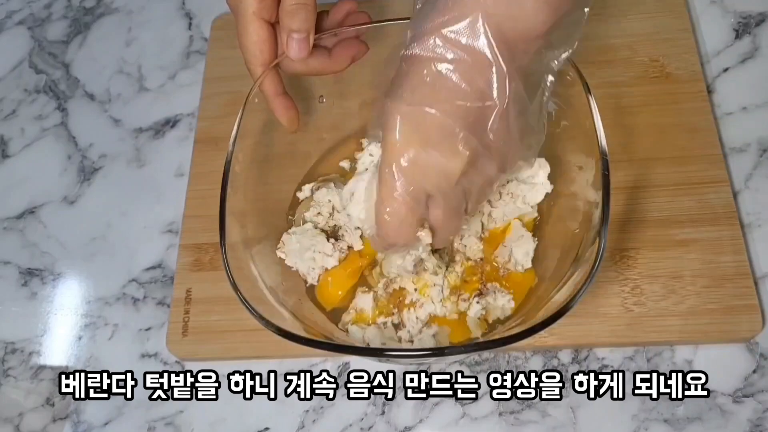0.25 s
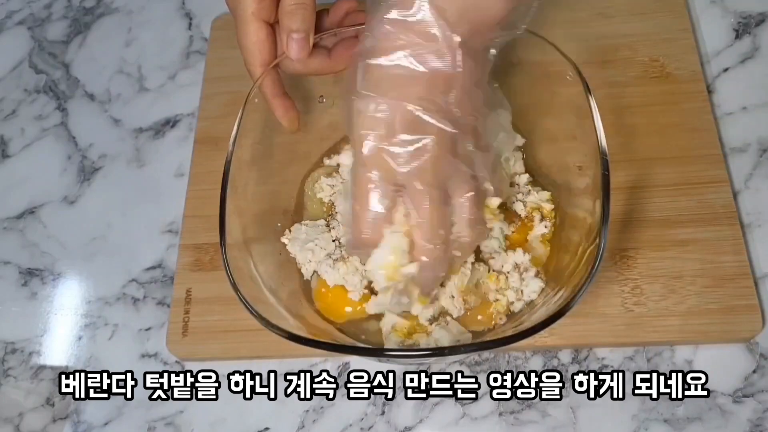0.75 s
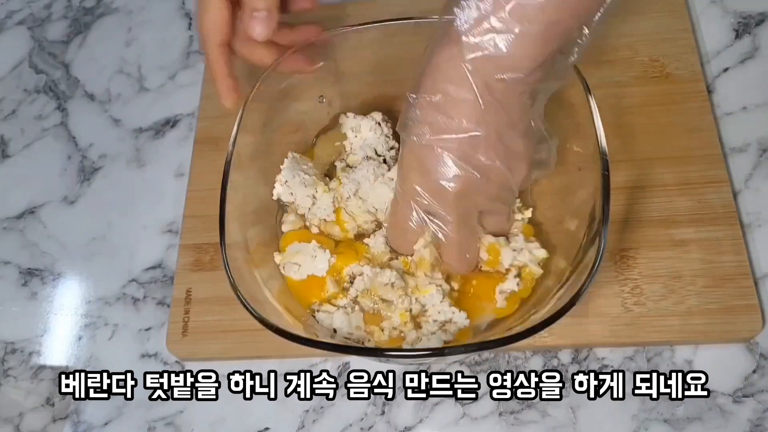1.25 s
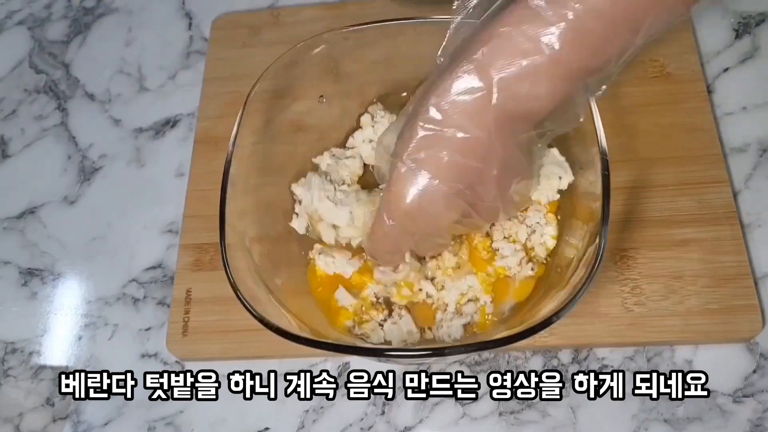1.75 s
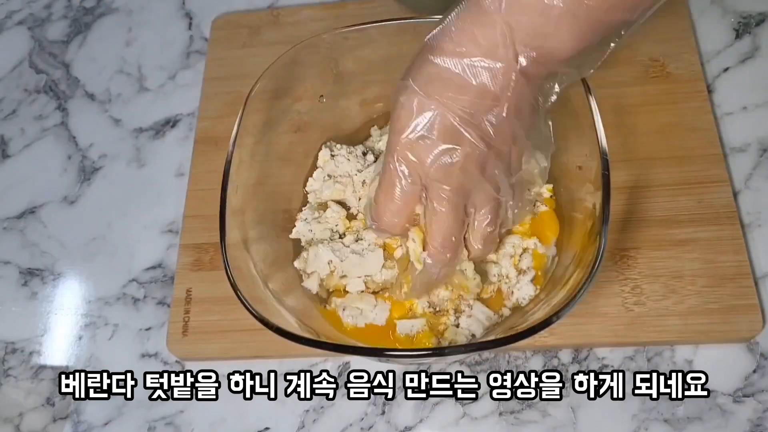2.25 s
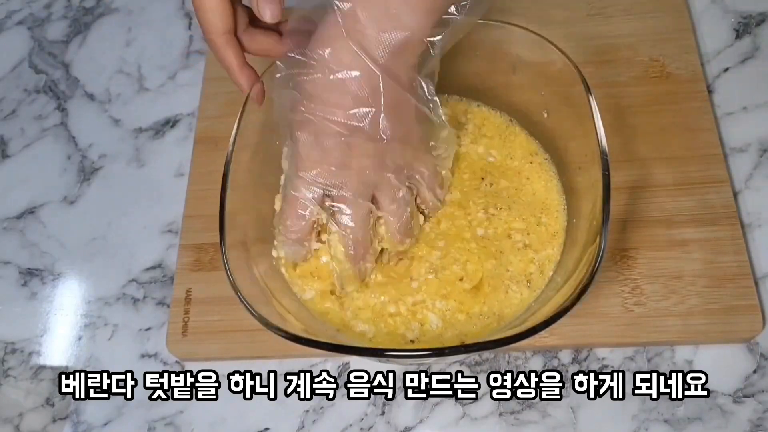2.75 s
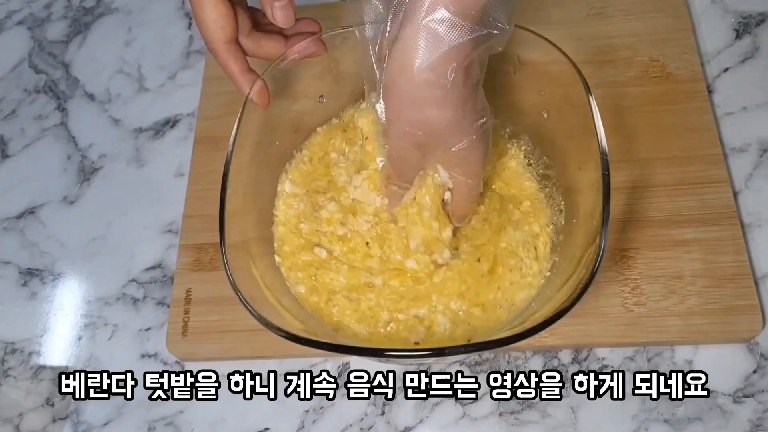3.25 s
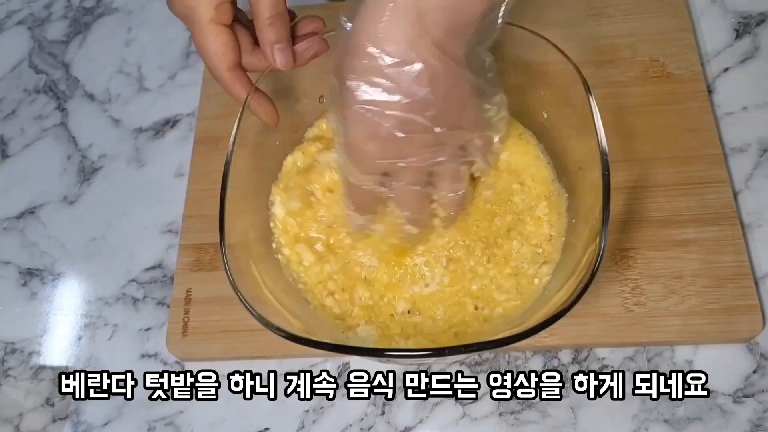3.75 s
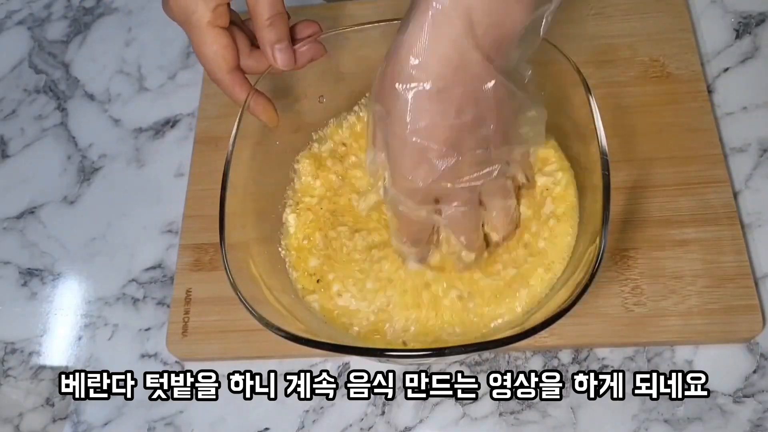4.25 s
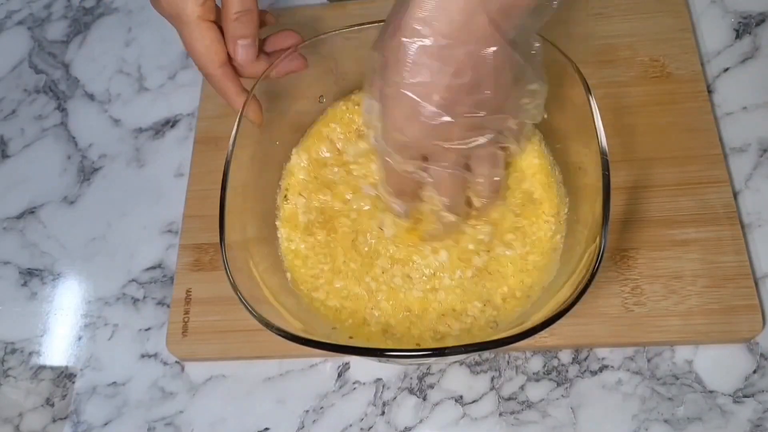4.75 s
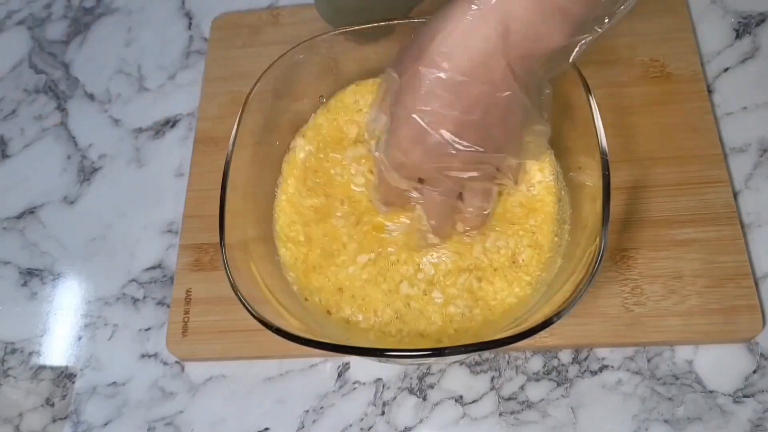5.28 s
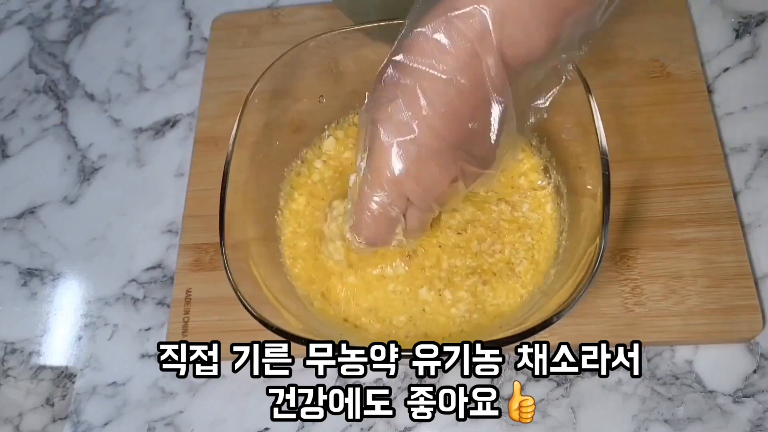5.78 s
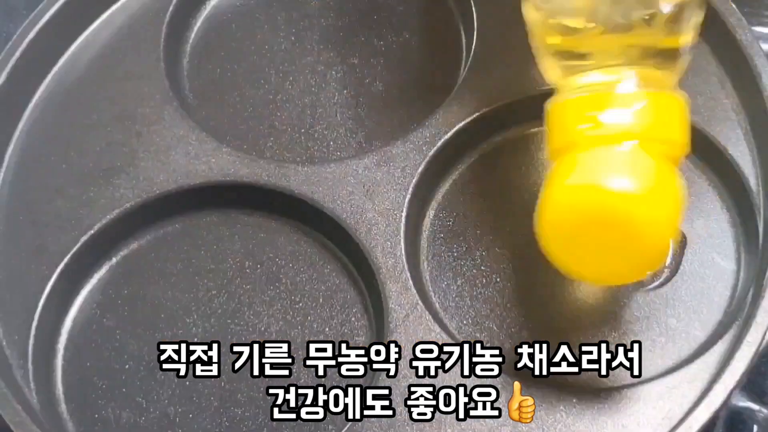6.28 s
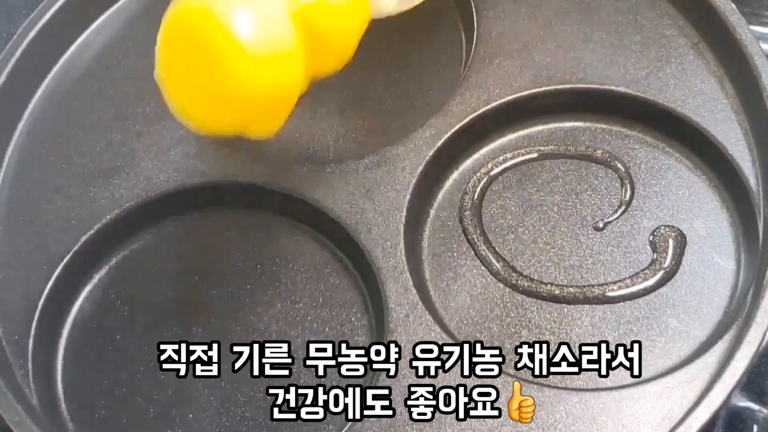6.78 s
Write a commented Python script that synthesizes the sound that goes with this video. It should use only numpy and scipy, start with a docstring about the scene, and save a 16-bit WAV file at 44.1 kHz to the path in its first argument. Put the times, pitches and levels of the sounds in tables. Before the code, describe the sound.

From the start, a hand in a thin plastic glove kneads wet food in a glass bowl, close by in a quiet kitchen. Several squeezes a second bring bright crinkles, sharp little snaps, wet squelches and small air pops. Now and then the bowl knocks softly on a board. At about 2.7 seconds a faint low rumble and hum come in underneath. The kneading continues, grows gentler from around 4 seconds, and is very faint between 5 and 5.8 seconds before picking up again. At about 6.4 seconds it stops, replaced by a stove fan's gusty hiss with faint, thin whistles and a low, wavering drone. Oil spits briefly from a bottle twice, faintly at 6.7 seconds and more clearly near 6.9, while the fan carries on to the end just after 7 seconds.

```python
"""In a kitchen, a hand in a thin plastic glove kneads soft food in a glass bowl. The glove rustles and snaps
as it folds, the mash squelches, air pockets pop, and the bowl thumps on the board.
Three scenes play with short gaps between them: kneading in a still room, kneading over a low rumble,
then a stove, where oil spurts twice from a bottle under a hissing fan and a low, wandering drone."""
import sys
import numpy as np
from scipy import signal
from scipy.io import wavfile

SR = 44100
rng = np.random.default_rng(int(sys.argv[2]) if len(sys.argv) > 2 else 0)


def to_wav(sig):
    """Store sig (one row per channel, or 1-D mono) as 16-bit WAV at the path in sys.argv[1].

    Samples outside -1..1 are clipped; the rate is SR.
    """
    pcm = np.clip(np.atleast_2d(sig), -1, 1) * 32767
    pcm = np.round(pcm).astype(np.int16)
    wavfile.write(sys.argv[1], SR, pcm.T)  # frames by channels


N = 309582

# when each scene plays: start_s, end_s
STILL_ROOM, RUMBLING_ROOM, STOVE = (-1, 2.623), (2.655, 6.351), (6.395, 8)
# the tone colour of each noise: pitch_hz, relative_db
STILL_COLOUR = [(12, -45), (20, -2), (43, -11), (114, -4.5), (277, -21), (558, -43), (709, -16), (900, -24),
                (1170, -11), (1980, -120)]
GLOVE_COLOUR = [(880, -49), (1500, -4.5), (1810, -3.5), (3960, 2.5), (5540, -2.5), (6180, 2), (12900, -3.5),
                (14900, -5), (16000, -8.5)]
MASH_COLOUR = [(120, -62), (200, -12.5), (318, -24), (354, -11.5), (471, -14.5), (660, -3.5), (782, -3),
               (1240, 2), (1520, -6.5), (2500, -5.5), (3250, -11), (5500, -120)]
RUMBLE_COLOUR = [(12, -20), (20, -11.5), (65, -7.5), (96, -12), (248, -26.5), (337, -24), (499, -27),
                 (698, -35), (1030, -32), (1660, -100), (11100, -49), (16000, -50)]
FAN_COLOUR = [(12, -48), (20, -24), (60, -12.5), (134, -6), (277, -17.5), (319, -13.5), (607, -25),
              (873, -13), (1290, -42), (3340, -38), (4060, -45), (4810, -31), (6360, -42), (12800, -41.5),
              (16000, -46)]
# how alike left and right are, for near and far sounds: pitch_hz, likeness (0 to 1)
NEAR_LIKENESS = [(130, 0.56), (640, 0.76), (1400, 0.57), (3000, 0.28), (15000, 0)]
FAR_LIKENESS = [(60, 0.83), (130, 0.9), (290, 0.76), (640, 0.38), (1400, 0.077), (3000, 0.03)]
# which side the hand is heard on: pitch_hz, left_minus_right_db
HAND_SIDE = [(300, -1.5), (600, 2.5), (1200, 5.5), (2500, 0.5), (9000, 2.5)]
# the hand resting in the mash: time_s, rustle_db, squelch_db
RESTING_HAND = [(0, -56, -72.5), (1.88, -57.5, -64), (2.3, -51, -55), (2.47, -65, -91), (2.698, -56.5, -71),
                (3.5, -91, -67), (3.9, -74, -78.5), (4.5, -74, -73.5), (4.95, -75.5, -80),
                (5.76, -81.5, -86.5), (5.82, -73, -65.5), (6.35, -57.5, -62)]
# fingers squeezing the mash: full_strength_s, hold_s, rustle_db, squelch_db
FINGER_SQUEEZES = [(0, 0.0022, -43.5, -45.5), (0.082, 0.079, -47.5, -57.5), (0.174, 0.039, -51.5, -59.5),
                   (0.276, 0.019, -50.5, -54), (0.328, 0.033, -45, -52), (0.402, 0.042, -48, -55.5),
                   (0.49, 0.039, -48.5, -60.5), (0.562, 0.035, -46.5, -56), (0.61, 0.04, -48.5, -57),
                   (0.726, 0.037, -46, -53.5), (0.798, 0.064, -46, -53.5), (0.888, 0.043, -49, -55),
                   (0.983, 0.069, -46, -55.5), (1.11, 0.089, -53.5, -55.5), (1.194, 0.052, -45.5, -58),
                   (1.272, 0.014, -50, -57), (1.341, 0.039, -43.5, -53), (1.404, 0.03, -48.8, -57.5),
                   (1.488, 0.061, -46.5, -50), (1.576, 0.023, -50, -56.5), (1.647, 0.0064, -43.5, -49.5),
                   (1.735, 0.032, -46, -55), (1.803, 0.024, -46.5, -54.5), (1.923, 0.056, -49, -56),
                   (1.983, 0.039, -49, -59.5), (2.052, 0.048, -53, -59.5), (2.146, 0.027, -43.5, -57.0),
                   (2.284, 0.015, -42.5, -52), (2.339, 0.0022, -43, -51.5), (2.396, 0.027, -51.5, -58.5),
                   (2.512, 0.02, -50.5, -56.5), (2.55, 0.1, -48, -55), (2.661, 0.058, -52, -56),
                   (2.788, 0, -51, -55.5), (2.833, 0.0025, -58, -65), (2.901, 0.051, -48, -59.5),
                   (3.028, 0.017, -50.5, -48), (3.098, 0.056, -56.5, -61.5), (3.15, 0.058, -59, -65.5),
                   (3.286, 0.054, -48, -57.5), (3.337, 0.046, -51, -57.5), (3.458, 0.0042, -52, -60.5),
                   (3.53, 0.039, -54.5, -62), (3.578, 0.032, -56, -74), (3.655, 0.057, -55.5, -61.5),
                   (3.751, 0.033, -54, -65), (3.838, 0.0035, -57, -61), (3.956, 0, -63, -68),
                   (4.131, 0, -59, -62.5), (4.181, 0.0, -52.5, -62), (4.247, 0, -61.5, -65.5),
                   (4.509, 0, -60, -59), (4.636, 0.066, -64.5, -77), (4.775, 0.084, -66, -70),
                   (5.02, 0, -71, -87), (5.073, 0.0076, -71, -89), (5.22, 0.0022, -70, -71),
                   (5.398, 0.05, -77, -77.5), (5.586, 0.067, -79, -89), (5.86, 0.044, -60.5, -70),
                   (5.953, 0.026, -53.5, -66), (6.015, 0.03, -58, -68), (6.114, 0.032, -48.5, -57),
                   (6.219, 0, -68, -57), (6.34, 0.086, -56.5, -80)]
# air pockets bursting in the mash: start_s, peak_db, pitch_hz
MASH_POPS = [(.006, -31.5, 1160), (.175, -43, 1170), (.289, -38, 1200), (.323, -37, 1150),
             (.481, -39, 1230), (.739, -33.5, 1370), (0.786, -40, 1370), (.84, -37, 1420),
             (.979, -35, 1230), (1.002, -35, 960), (1.147, -40, 1100), (1.185, -35, 1240),
             (1.278, -33, 1090), (1.537, -33, 820), (1.624, -37, 1290), (1.641, -27.5, 1220),
             (1.668, -39, 1240), (1.737, -38, 1350), (1.812, -37, 885), (2.084, -39, 1097),
             (2.283, -41, 1800), (2.346, -32, 1480), (2.399, -33, 1110), (2.522, -33.5, 1190),
             (2.564, -36, 1280), (2.577, -40, 1210), (2.78, -42.5, 920), (2.79, -46, 1190),
             (2.832, -44.5, 990), (2.93, -52, 1190), (2.95, -41, 1250), (3.014, -44, 1190),
             (3.183, -46, 1200), (3.242, -43, 1230), (3.468, -37, 1580), (3.476, -40, 1370),
             (3.55, -48, 1290), (3.66, -47, 1200), (3.7, -50, 1300), (3.725, -45.5, 1370),
             (3.759, -48, 1200), (3.826, -45, 1980), (3.855, -47.5, 1240), (3.995, -56.5, 1280),
             (4.043, -56, 1240), (4.134, -48.5, 1170), (4.18, -38.5, 1820), (4.291, -53.5, 1060),
             (4.35, -53, 1800), (4.492, -47.5, 760), (4.635, -47, 2190), (4.681, -43, 1350),
             (4.802, -48, 737), (4.902, -58, 910), (4.979, -60, 1090), (5.02, -55.5, 920),
             (5.144, -60, 1400), (5.221, -54, 1205), (6.035, -47, 1300), (6.083, -40.5, 1170),
             (6.142, -32.5, 1020)]
# loud snaps of the glove: time_s, peak_db, pitch_hz, left_minus_right_db
GLOVE_SNAPS = [(0.0217, -27, 9000, 5), (0.0944, -30.0, 9800, 12), (0.1409, -28.5, 12700, 5),
               (0.2082, -33.5, 9550, 3), (0.2236, -34, 10300, 2.0), (0.3242, -31, 13500, 8),
               (0.3963, -31, 10000, 3.0), (0.4134, -33, 5000, 9), (0.4816, -28, 2820, 7),
               (0.5211, -27, 10000, 2), (0.5822, -23, 9500, 6), (0.5914, -33, 12700, 3.0),
               (0.5982, -26.5, 13500, 3), (0.6801, -30.5, 8600, 0.0), (0.8074, -29, 13200, 3.0),
               (0.816, -30.5, 7700, 2), (0.8939, -31, 10100, 5.0), (0.9114, -19.5, 5900, 1),
               (0.9414, -28.5, 12700, 8.0), (0.9813, -31, 7250, 12), (1.0792, -37, 10800, 3),
               (1.1492, -28, 7450, 3), (1.1863, -23.5, 6670, 3.5), (1.2533, -38, 9600, 6.0),
               (1.2781, -31, 9300, 4), (1.3717, -26, 9900, -0.5), (1.445, -26, 8900, -3),
               (1.4939, -26.5, 9200, -1), (1.5392, -29, 12700, 1.0), (1.5538, -28.5, 7800, 5),
               (1.6022, -33, 11400, 3.0), (1.6227, -29, 9800, 3), (1.6685, -32, 12600, 5),
               (1.7377, -30, 10600, 2.0), (1.852, -34.5, 11100, 6.0), (1.8946, -31.5, 7100, 4.0),
               (1.9078, -31.0, 10800, 3), (1.9246, -25.5, 11900, 3.0), (2.0838, -34, 6900, 8.0),
               (2.1063, -30, 8750, 7), (2.1878, -34, 12700, 6.0), (2.21, -25.5, 12900, 7),
               (2.3414, -32, 4930, -7), (2.402, -28.5, 9500, 7.0), (2.4563, -35, 6800, 3.0),
               (2.4902, -40.0, 8900, 3.0), (2.5227, -28.5, 10100, 1), (2.563, -22, 8000, 3.0),
               (2.5914, -24, 13400, 5.5), (2.6671, -35, 6340, 3.0), (2.7172, -33, 11200, 3.0),
               (2.7869, -34, 11200, -5), (2.8855, -33, 6200, 1.0), (2.9026, -33, 11200, 7.0),
               (2.9661, -37, 8700, 4.0), (3.0037, -36, 9200, 5), (3.0958, -30, 10400, 6.0),
               (3.1372, -35.5, 10300, 2), (3.1935, -34, 12800, 6.0), (3.2458, -34.5, 9500, 5),
               (3.3111, -27, 5300, 0), (3.4399, -32.5, 8200, 2), (3.4689, -36.5, 2500, -4),
               (3.4758, -36.0, 11300, -1), (3.5341, -26, 3960, -1), (3.6149, -36.5, 9600, 10),
               (3.6637, -30, 9700, 6), (3.9524, -39.5, 9700, 7), (4.0102, -48, 7700, 3),
               (4.0415, -47, 7100, 2), (4.1017, -47, 9600, 7.0), (4.1349, -30.0, 11300, 8),
               (4.1788, -28, 9700, 7), (4.2553, -45.0, 3800, 0), (4.6361, -28.5, 10300, 7),
               (4.6615, -40, 9400, 3.0), (4.6819, -41, 9000, 10), (4.7379, -41, 7260, 6),
               (4.781, -49.0, 9600, 8.0), (4.8419, -36, 8300, 4), (5.0932, -50, 11100, 3.0),
               (5.2222, -53, 8000, 2), (5.2397, -50.5, 5540, 1), (5.8184, -40.5, 6550, 8.0),
               (5.8699, -38, 5330, 5.0), (5.9061, -34, 6940, 2.0), (5.9589, -33.5, 11700, 9),
               (6.0373, -46, 3130, 3.0), (6.1283, -34, 12700, 2.0), (6.2094, -36, 9900, 7),
               (6.2595, -39.5, 5330, 1.0)]
# the bowl pressed on the board: start_s, level_db, pitch_hz, decay_s
BOWL_THUMPS = [(.22, -62, 102, 0.054), (.73, -65.5, 146, 0.057), (1.15, -52.5, 386, 0.013),
               (1.49, -46, 73.6, 0.017), (1.88, -61, 138, 0.027), (2.27, -55.5, 442, 0.052),
               (3.02, -51.5, 147, 0.021), (3.15, -59.5, 130, 0.027), (3.46, -57, 183, 0.043),
               (4.49, -46.5, 303, 0.019), (4.795, -55.5, 271, 0.029), (6.11, -57, 133, 0.027)]
# the wet glove loses its highest treble for a while: time_s, gain_db
TREBLE_GAIN = [(3.3, 3.5), (3.8, -5.5), (5.1, 3.5), (5.6, 5.5)]
# the rumble's rise and fall: time_s, gain_db
RUMBLE_GAIN = [(2.65, 5.5), (3.5, 1.5), (4.0, 1.5), (4.85, 1), (5.1, -3), (5.5, -1), (5.8, -0.5), (6.35, 2)]
# the fan's rushing air: time_s, level_db
FAN_AIR_LEVEL = [(6.4, -48.5), (6.75, -48), (6.9, -44.5), (7.02, -47.5)]
# a low drone wandering at random between about 100 and 150 Hz: time_s, pitch_hz, level_db
LOW_DRONE = [(6.41, 149.3, -53), (6.47, 138.8, -51), (6.55, 117.3, -47), (6.61, 151.6, -48.5),
             (6.71, 100.2, -53), (6.79, 135.6, -46.5), (6.84, 151.4, -48), (6.9, 118.1, -49.5),
             (7.0, 139.6, -47)]
# the fan's thin whistles: pitch_hz, width_hz, level_db
FAN_WHISTLES = [(4120, 330, -67.5), (6500, 97, -71.5), (11500, 590, -75), (12500, 800, -73)]
# oil spurting from the bottle: start_s, level_db, pitch_hz, decay_s
OIL_SPURTS = [(6.71, -56, 9200, 0.01), (6.868, -42.5, 1480, 0.015)]

BOWL_HZ, BOWL_WIDTH_HZ = 1332, 69   # the ring of the air in the bowl's hollow
KNEADING_END_S = RUMBLING_ROOM[1]


def from_db(db):
    """Turns decibels into a gain."""
    return 10 ** (np.asarray(db) / 20)


def unit_level(x):
    """Scales a sound to an average (rms) level of 1."""
    return x / np.sqrt(np.mean(x ** 2) + 1e-20)


def over_time(rows):
    """Joins a table's points with lines, giving one value per sample."""
    time_s, *columns = np.transpose(rows)
    return [np.interp(np.arange(N) / SR, time_s, column) for column in columns]


def at_pitch(rows, hz):
    """Reads a table at one pitch."""
    pitches, values = np.transpose(rows)
    return np.interp(np.log(hz), np.log(pitches), values)


def sides(side_db):
    """Left and right gains; above 0 dB the left is louder."""
    return from_db(side_db / 2 * np.array([[1], [-1]]))


def during(span):
    """Lets sound through within a scene, with 2 ms edges and a faint 25 ms spill outside."""
    t = np.arange(N) / SR
    inside_s = np.minimum(t - span[0], span[1] - t)
    return np.clip(inside_s / 0.002, 0, 1) + from_db(-21.5) * np.clip(inside_s / 0.025 + 1, 0, 1)


def ring(x, hz, width_hz):
    """Keeps the part of a sound near one pitch."""
    r = np.exp(-np.pi * width_hz / SR)
    feedback = [1, -2 * r * np.cos(2 * np.pi * hz / SR), r * r]
    return signal.lfilter(np.array([1, 0, -1]) * (1 - r * r) / 2, feedback, x)


def add(out, start_s, burst):
    """Mixes a short sound in."""
    i = max(round(start_s * SR), 0)
    out[:, i:i + burst.shape[1]] += burst[:, :N - i]


def flicker(per_s, spread_db, decay_s, size=N):
    """Random spikes of power that die quickly; few are large, and the average is 1."""
    starts = rng.random(size) < per_s / SR
    spikes = starts * from_db(2 * spread_db * np.minimum(rng.exponential(1, size), 4))
    rounded = signal.lfilter([1], [1, -0.9], spikes + 1e-18)
    power = signal.lfilter([1], [1, -np.exp(-1 / (decay_s * SR))], rounded)
    return power / power.mean()


def coloured_noise(colour, likeness, texture=None, side=((100, 1.5), (9000, 2.0)), size=N):
    """Stereo noise in half-octave bands, each with its own level, side and optional texture."""
    out, white = 0, rng.standard_normal((2, 2, size))
    edges_hz = 20 * 2 ** np.arange(0, 10, 0.5)
    for k, (low, high) in enumerate(zip(edges_hz, np.append(edges_hz[1:], 19000))):
        if high < colour[0][0] or low > colour[-1][0]:
            continue
        band_pass = signal.butter(2, [low, high], "band", fs=SR, output="sos")
        shared, opposite = signal.sosfilt(band_pass, white[k % 2])
        hz = np.sqrt(low * high)
        alike = np.clip(at_pitch(likeness, hz), 0, 1)
        band = np.sqrt(1 + alike) * shared + np.sqrt(1 - alike) * opposite * [[1], [-1]]
        gain = from_db(at_pitch(colour, hz)) * sides(at_pitch(side, hz))
        out = out + gain * band * (texture() if texture else 1)
    return unit_level(out)


def crackly_noise(colour, effort, per_s, spread_db, decay_s, smooth, shared):
    """Noise that crackles more with effort, both in all bands at once and in each band alone."""
    all_bands = flicker(per_s, spread_db, decay_s)

    def texture():
        crackle = shared * all_bands + flicker(per_s / 2, spread_db, decay_s)
        return np.sqrt(smooth + effort * crackle + (1 - effort) * (shared + 1))
    return coloured_noise(colour, NEAR_LIKENESS, texture, HAND_SIDE)


def puffs(rows, width, hiss, rise_s, alike):
    """Bursts of noise around one pitch that swell quickly and die away."""
    out, t = np.zeros((2, N)), np.arange(7000) / SR
    for start_s, db, hz, decay_s in rows:
        white = rng.standard_normal((3, len(t)))
        noise = alike * white[0] + (1 - alike) * white[1:]
        pitched = unit_level(ring(ring(noise, hz, width * hz), hz, 2 * width * hz))
        shape = (1 - np.exp(-t / rise_s)) * np.exp(-t / decay_s)
        add(out, start_s, from_db(db) * (pitched + hiss * noise) * shape)
    return out


def drift(rate_hz):
    """A slow random wander, about 1 in size."""
    r = np.exp(-2 * np.pi * rate_hz / SR)
    return unit_level(signal.lfilter([1], [1, -2 * r, r * r], rng.standard_normal(N + SR))[SR:])


def still_room():
    """The very faint, low hush of a quiet room."""
    hush = from_db(-79) * coloured_noise(STILL_COLOUR, NEAR_LIKENESS, size=3 * SR)
    return np.pad(hush, [(0, 0), (0, N - 3 * SR)])


def kneading_levels(swell_db_per_s=407, fade_db_per_s=346):
    """Rustle and squelch levels in dB: each squeeze swells, holds and fades over the resting hand."""
    t = np.arange(0, N, 32) / SR
    full_s, hold_s, *peaks_db = np.transpose(FINGER_SQUEEZES)[:, :, None]
    swell_db = swell_db_per_s * np.minimum(t - full_s, 0)
    fade_db = fade_db_per_s * np.minimum(full_s + hold_s - t, 0)
    levels_db = []
    for rest_db, peak_db in zip(over_time(RESTING_HAND), peaks_db):
        power = np.sum(from_db(2 * (peak_db + swell_db + fade_db)), axis=0)
        power = np.interp(np.arange(N) / SR, t, power)
        levels_db.append(10 * np.log10(from_db(2 * rest_db) + power))
    return levels_db


def glove_rustle(effort):
    """Thin plastic creases in many tiny, bright ticks."""
    return crackly_noise(GLOVE_COLOUR, effort, per_s=240, spread_db=2, decay_s=0.0009,
                         smooth=2.2, shared=1.5)


def mash_squelch(effort):
    """Squeezed food crackles wetly, and the bowl's hollow rings with it."""
    wet = crackly_noise(MASH_COLOUR, effort, per_s=150, spread_db=2.5, decay_s=0.004,
                        smooth=1.1, shared=0.4)
    return unit_level(wet + 0.82 * ring(wet, BOWL_HZ, BOWL_WIDTH_HZ))


def mash_pops(rows, rise_cycles=0.85, decay_cycles=2.2):
    """An air pocket bursts: a short, rough tone with a brighter splat, then the bowl rings on."""
    out = np.zeros((2, N))
    for start_s, db, hz in rows:
        noise = rng.standard_normal((2, 1300))
        cycles = np.arange(1300) * hz / SR
        rough = unit_level(ring(ring(noise, hz, 0.68 * hz), hz, 2.2 * hz))
        splat = unit_level(ring(ring(noise, 1.44 * hz, 0.83 * hz), 1.37 * hz, 0.85 * hz))
        tone = np.sin(2 * np.pi * cycles) + 0.53 * rough + 0.19 * splat
        age = cycles / from_db(0.29 * (-38.5 - db))   # weak pops rise and fade more slowly
        pop = tone * (1 - np.exp(-age / rise_cycles)) * np.exp(-age / decay_cycles)
        pop = pop + 0.67 * ring(pop, BOWL_HZ, BOWL_WIDTH_HZ)
        add(out, start_s, from_db(db) * sides(4) * pop / np.abs(pop).max())
    return out


def small_pops(squelch_db, per_s=22, low_hz=900, high_hz=2600):
    """Air pockets burst at random moments, louder when the squelch is loud."""
    count = int(per_s * KNEADING_END_S)
    when, pitch = rng.random((count, 2)).T
    start_s = when * KNEADING_END_S
    hz = low_hz * (high_hz / low_hz) ** pitch ** 2
    db = squelch_db[(start_s * SR).astype(int)] + rng.normal(6, 2, count)
    return mash_pops(zip(start_s, db, hz))


def glove_snaps(rows, rise_s=0.0004, decay_s=0.0006, tail_db=-18, tail_s=0.006):
    """A fold of plastic buckles: a sharp click of noise with one strong pitch and a faint tail."""
    out, t = np.zeros((2, N)), np.arange(-100, 1000) / SR
    after = np.maximum(t, 0)
    fade = np.exp(-after / decay_s) + from_db(tail_db) * np.exp(-after / tail_s)
    shape = np.exp(np.minimum(t, 0) / rise_s) * fade
    high_pass = signal.butter(1, 1500, "high", fs=SR, output="sos")
    for time_s, db, hz, side_db in rows:
        noise = signal.sosfilt(high_pass, rng.standard_normal((2, len(t))))
        snap = shape * (0.55 * np.diff(noise, prepend=0) + unit_level(ring(noise, hz, 0.21 * hz)))
        snap /= np.abs(snap).max(axis=1, keepdims=True)
        add(out, time_s + t[0], from_db(db) * sides(side_db) * snap)
    return out


def small_snaps(rustle_db, per_s=60, low_hz=2500, high_hz=13000):
    """Small folds buckle at random moments, louder when the rustle is loud."""
    count = int(per_s * KNEADING_END_S)
    when, pitch = rng.random((count, 2)).T
    extra_db, side_db = rng.normal([11.5, 3], [2.5, 4], (count, 2)).T
    time_s = when * KNEADING_END_S
    hz = low_hz * (high_hz / low_hz) ** pitch
    db = rustle_db[(time_s * SR).astype(int)] + extra_db
    return glove_snaps(zip(time_s, db, hz, side_db), rise_s=0.00016, decay_s=0.00037, tail_db=-17)


def bowl_thumps():
    """The bowl is pressed on the board and gives dull knocks."""
    return puffs(BOWL_THUMPS, width=0.82, hiss=0, rise_s=0.0052, alike=0.69)


def kneading_hand():
    """Rustle and squelch follow the squeezes, with snaps, pops and thumps on top."""
    rustle_db, squelch_db = kneading_levels()
    effort = np.clip((rustle_db + 102) / 22, 0, 1)   # a gentle hand crackles less
    kneading = from_db(rustle_db) * glove_rustle(effort) + from_db(squelch_db) * mash_squelch(effort)
    thumps = bowl_thumps()
    kneading += small_snaps(rustle_db) + small_pops(squelch_db)
    hand = kneading * (during(STILL_ROOM) + during(RUMBLING_ROOM)) + glove_snaps(GLOVE_SNAPS)
    body = signal.sosfiltfilt(signal.butter(2, 11500, fs=SR, output="sos"), hand)
    treble = from_db(over_time(TREBLE_GAIN)[0]) * (hand - body)
    return body + treble + mash_pops(MASH_POPS) + thumps


def room_rumble(hum_hz=123, low_hz=62, wander_hz=6):
    """Low noise with a steady-pitched hum and a lower, wandering one; all sway in loudness."""
    noise = from_db(-64 + over_time(RUMBLE_GAIN)[0]) * coloured_noise(RUMBLE_COLOUR, FAR_LIKENESS)
    hum = from_db(-74.5 + 2 * drift(3.2)) * np.sin(2 * np.pi * hum_hz * np.arange(N) / SR)
    cycles = np.cumsum(low_hz + wander_hz * drift(10)) / SR
    low_hum = from_db(-67 + 4.3 * drift(2.9)) * np.sin(2 * np.pi * cycles)
    return noise + np.sqrt(2) * (hum + low_hum) * sides(0.83)


def stove_fan():
    """A fan's gusty, hissing air and whistles, in the last second."""
    gusts = np.sqrt(0.4 + 0.6 * flicker(per_s=55, spread_db=1.2, decay_s=0.004, size=SR))
    air = coloured_noise(FAN_COLOUR, FAR_LIKENESS, size=SR)
    middle = signal.sosfiltfilt(signal.butter(1, [220, 2500], "band", fs=SR, output="sos"), air)
    air = unit_level(air + (gusts - 1) * middle)   # gusts shake the middle pitches
    air_db, = over_time(FAN_AIR_LEVEL)
    fan = from_db(air_db[-SR:]) * air + fan_whistles(SR)
    return np.pad(fan, [(0, 0), (N - SR, 0)])


def fan_whistles(size):
    """Hiss squeezed into a few narrow, high bands."""
    out = 0
    for hz, width_hz, db in FAN_WHISTLES:
        noise = rng.standard_normal((2, size))
        out = out + from_db(db) * unit_level(ring(ring(noise, hz, width_hz), hz, width_hz))
    return out


def low_drone():
    """A low drone wandering at random between about 100 and 150 Hz."""
    hz, db = over_time(LOW_DRONE)
    return np.sqrt(2) * from_db(db) * np.sin(2 * np.pi * np.cumsum(hz) / SR) * sides(1.3)


def oil_spurts():
    """Oil leaves the bottle in short, hissy spits."""
    return puffs(OIL_SPURTS, width=0.58, hiss=0.9, rise_s=0.0017, alike=0.096)


def scene():
    """The hand and the oil bottle over the background of each scene."""
    rooms = still_room() * during(STILL_ROOM) + room_rumble() * during(RUMBLING_ROOM)
    oil = oil_spurts()
    return rooms + kneading_hand() + (stove_fan() + low_drone()) * during(STOVE) + oil


def record(dry, cutoff_hz=15600):
    """The right side arrives three samples late, and the very highest treble is cut steeply."""
    late_right = np.append(np.zeros(3), dry[1, :-3])
    low_pass = signal.ellip(12, 0.3, 70, cutoff_hz, fs=SR, output="sos")
    return signal.sosfilt(low_pass, np.array([dry[0], late_right]))


dry = scene()
out = record(dry)
to_wav(out)
```